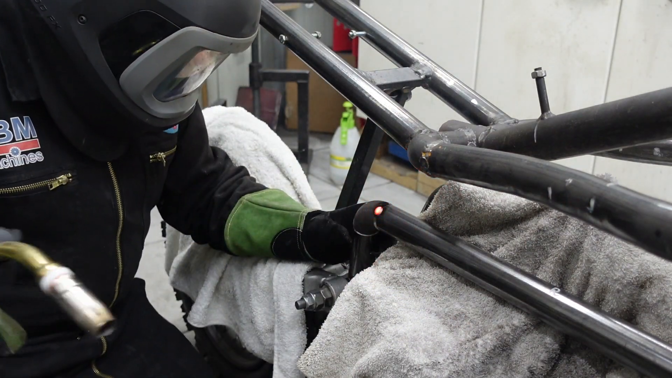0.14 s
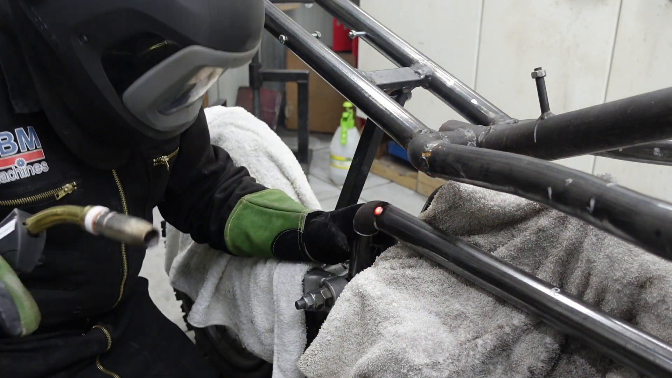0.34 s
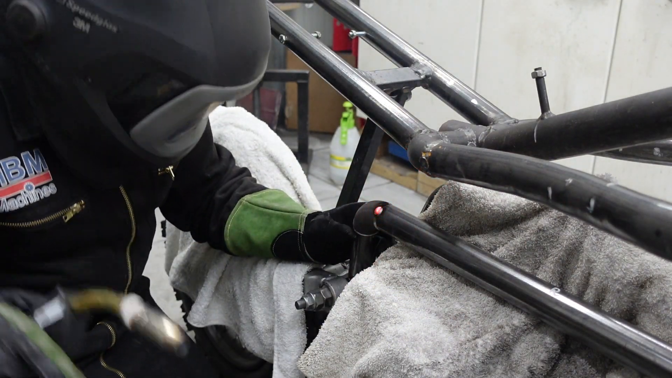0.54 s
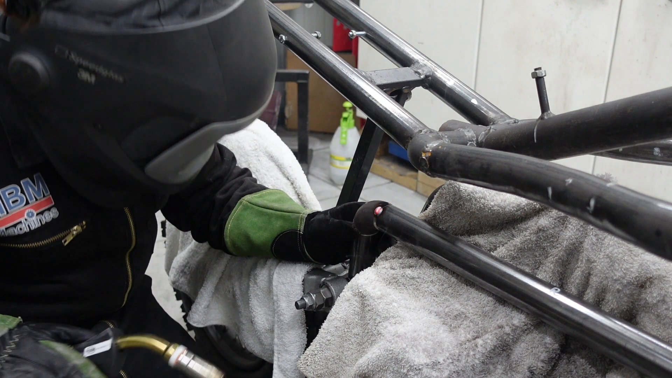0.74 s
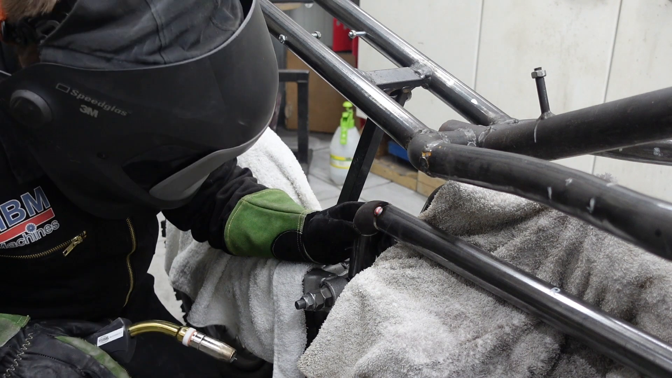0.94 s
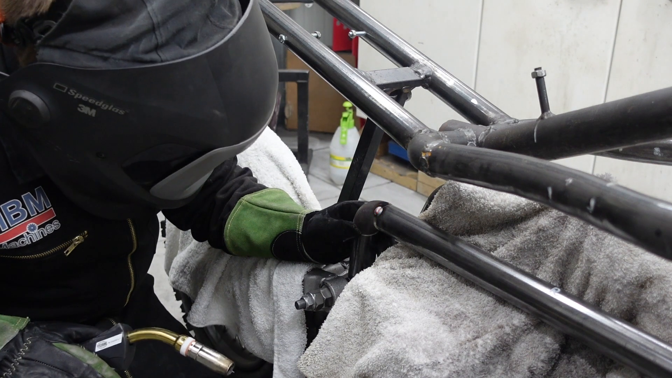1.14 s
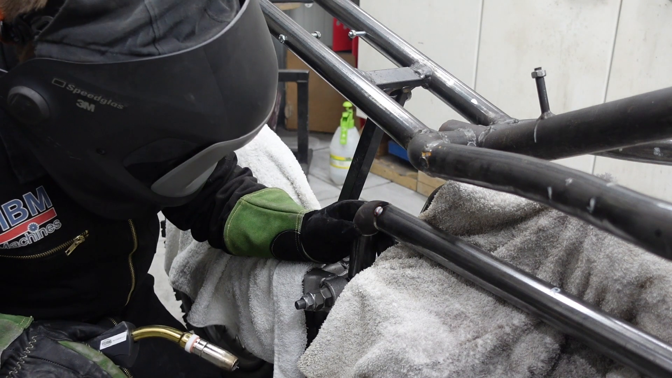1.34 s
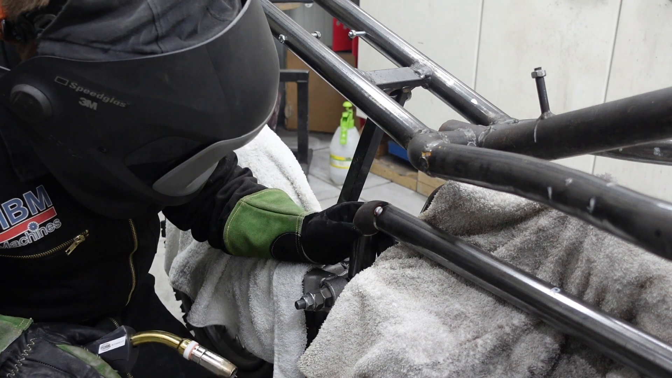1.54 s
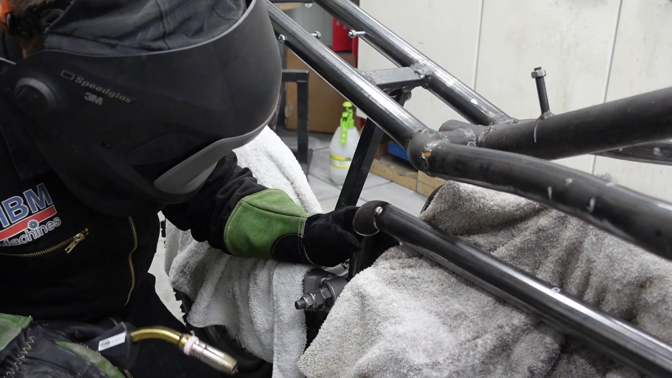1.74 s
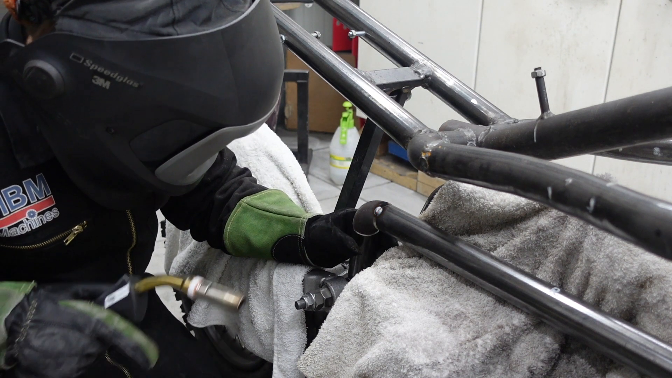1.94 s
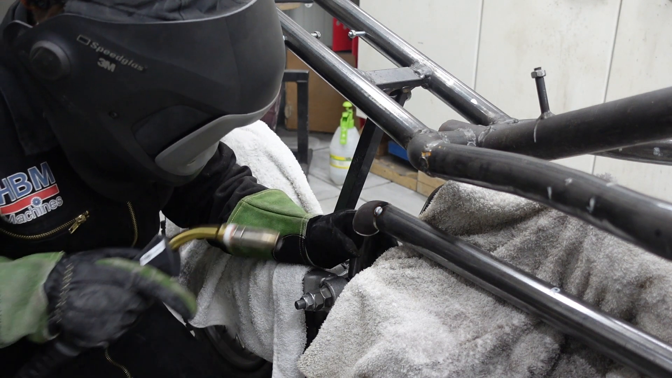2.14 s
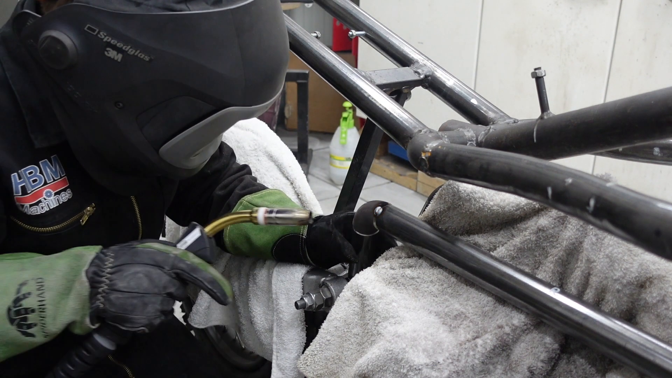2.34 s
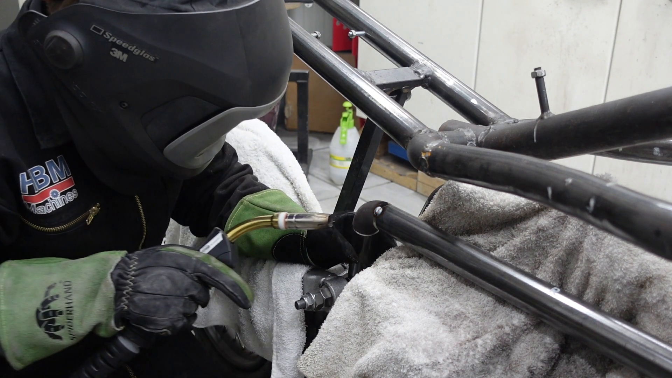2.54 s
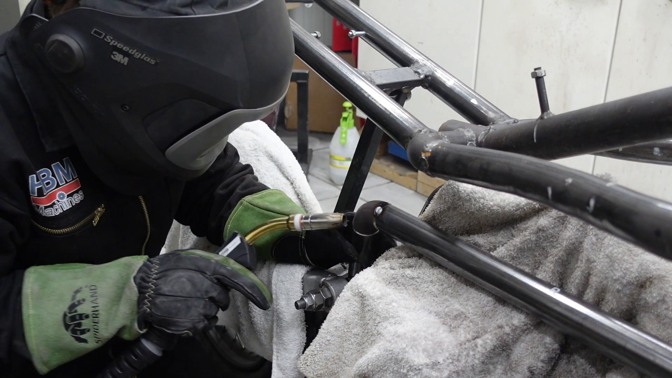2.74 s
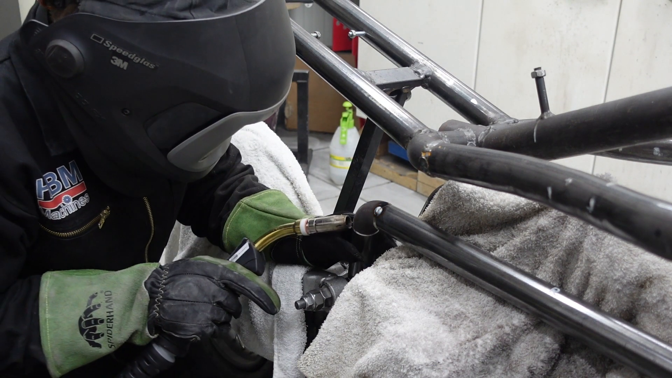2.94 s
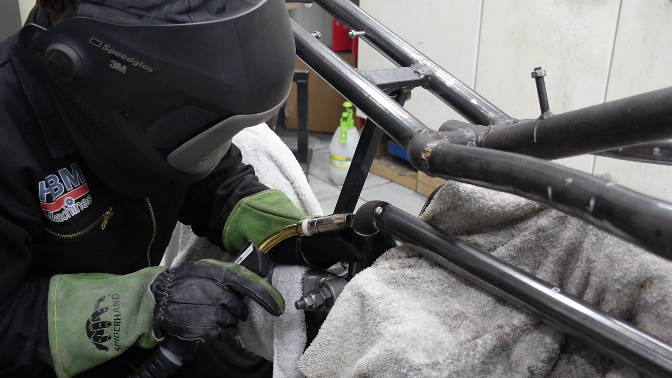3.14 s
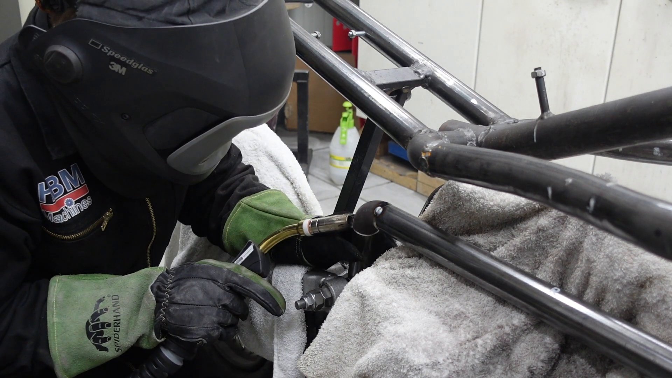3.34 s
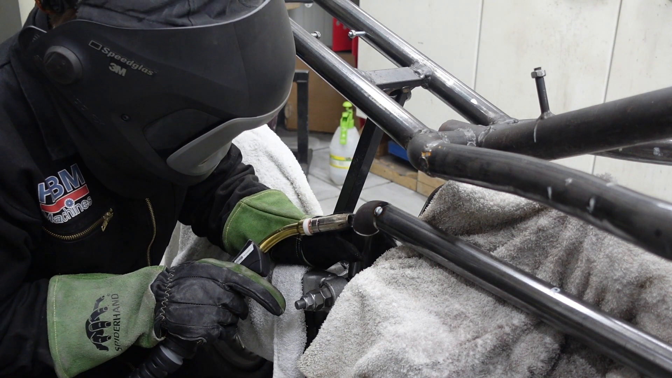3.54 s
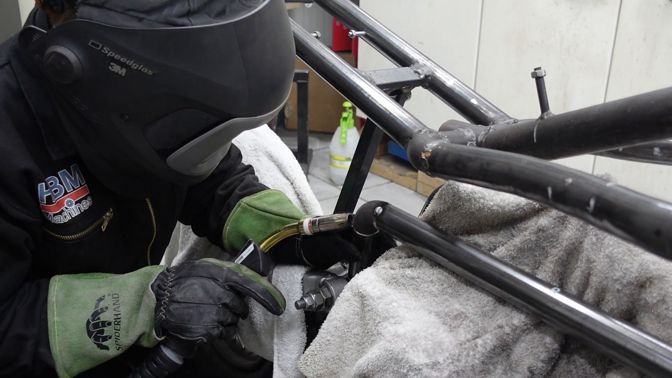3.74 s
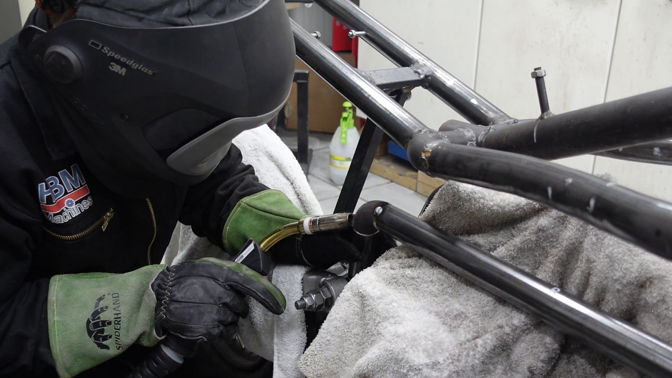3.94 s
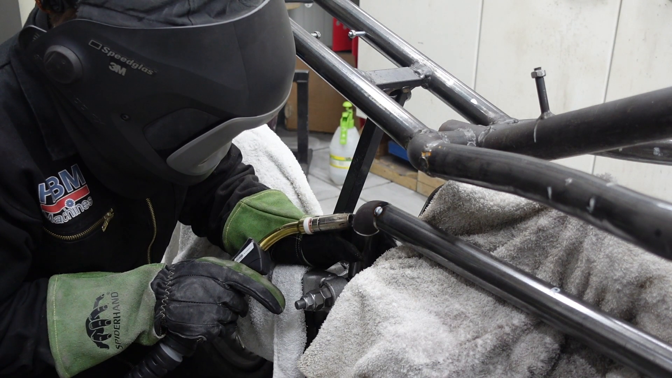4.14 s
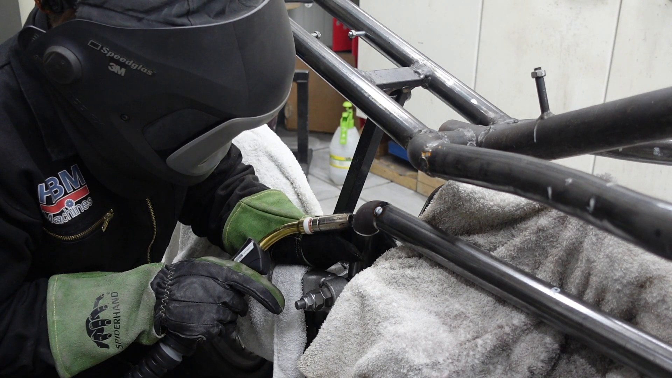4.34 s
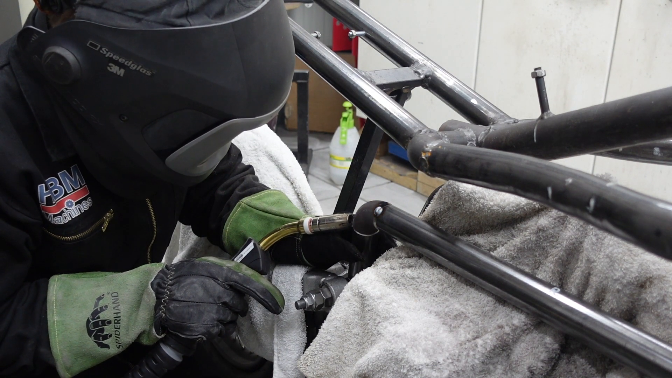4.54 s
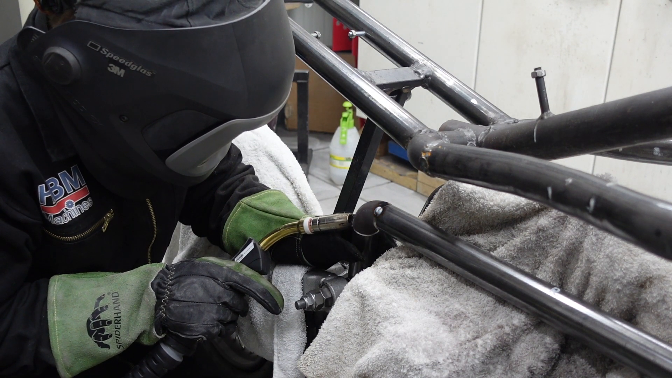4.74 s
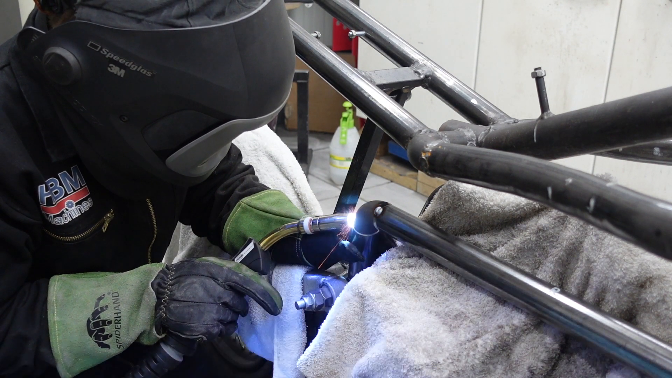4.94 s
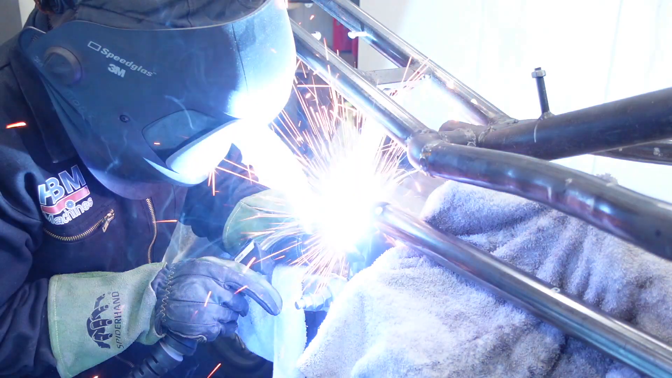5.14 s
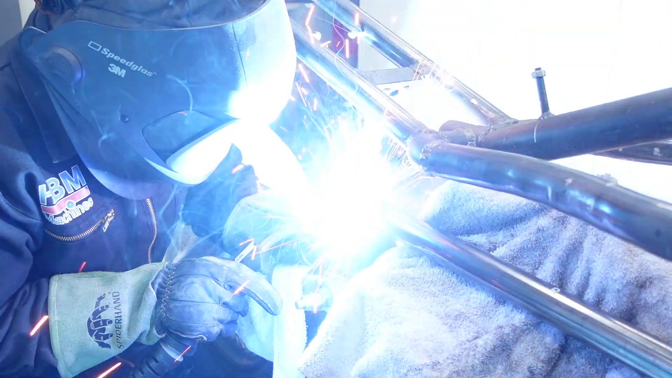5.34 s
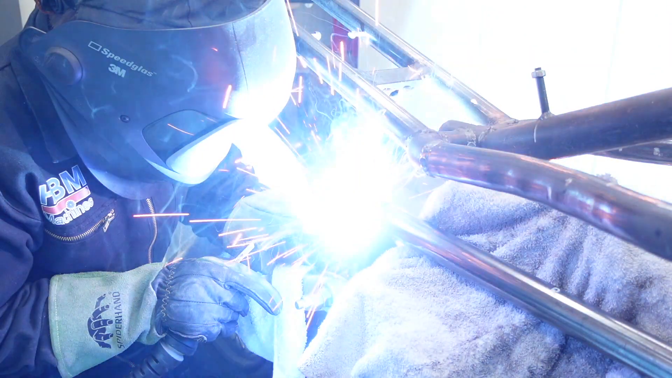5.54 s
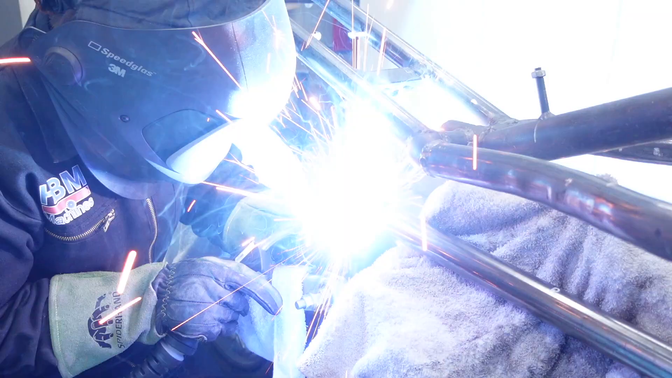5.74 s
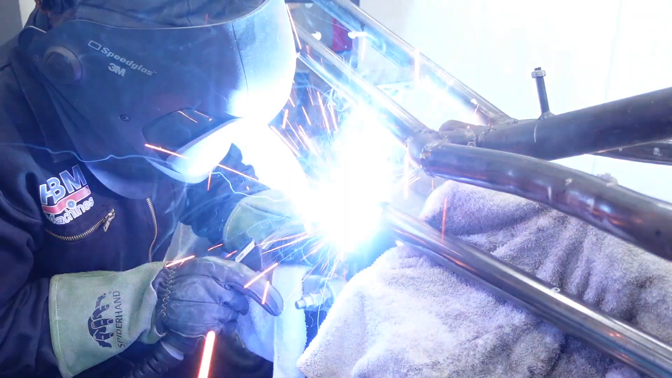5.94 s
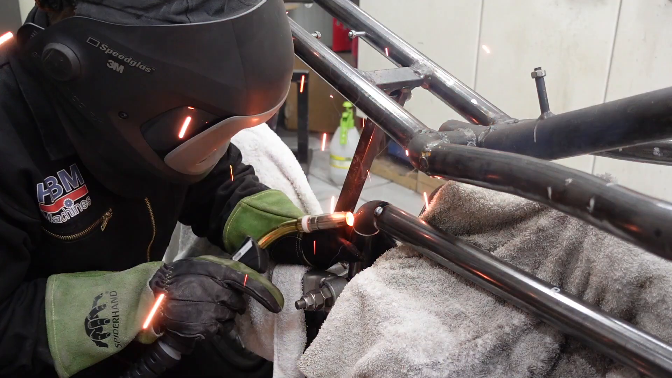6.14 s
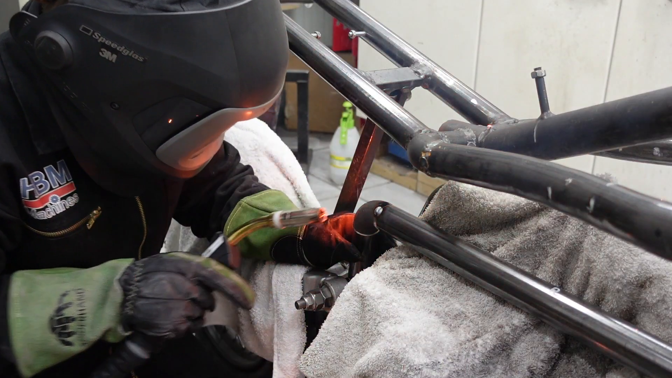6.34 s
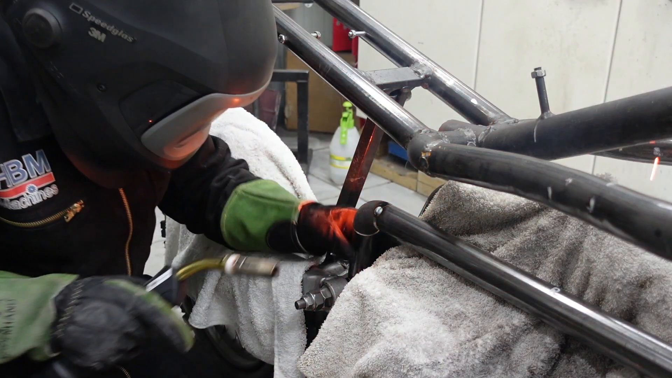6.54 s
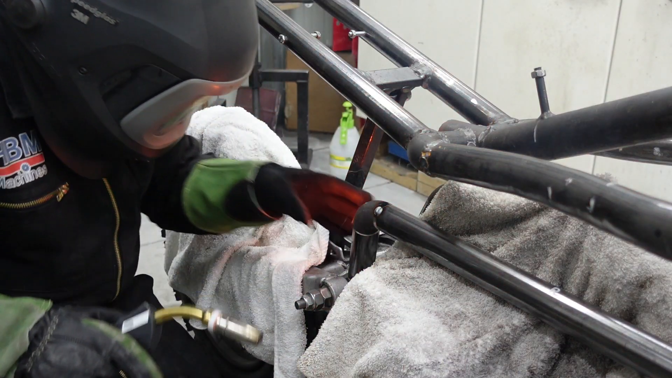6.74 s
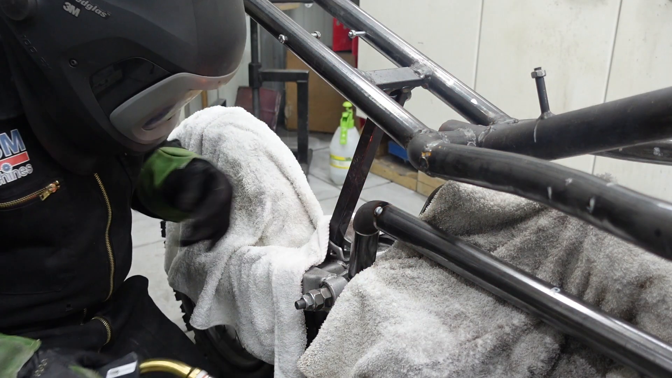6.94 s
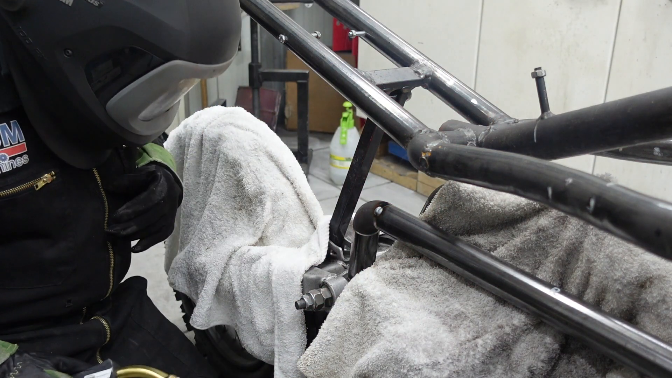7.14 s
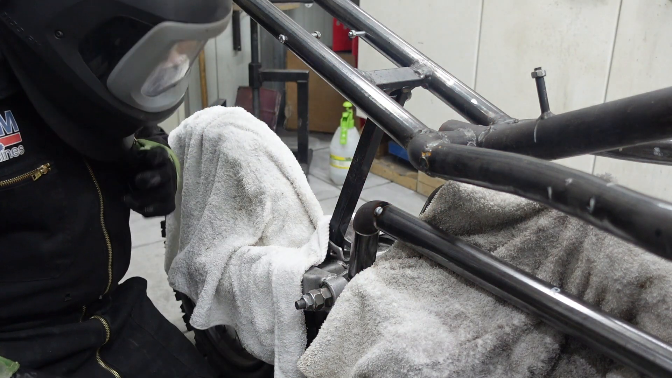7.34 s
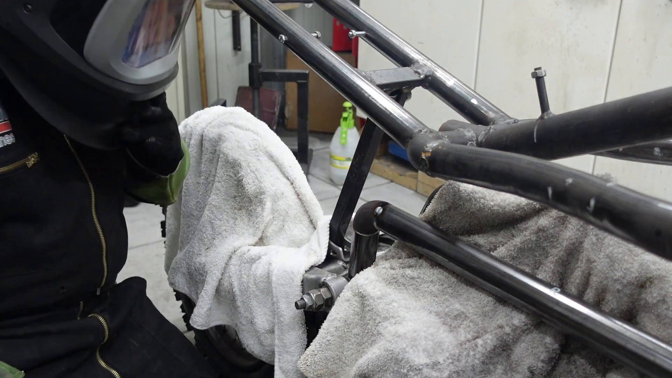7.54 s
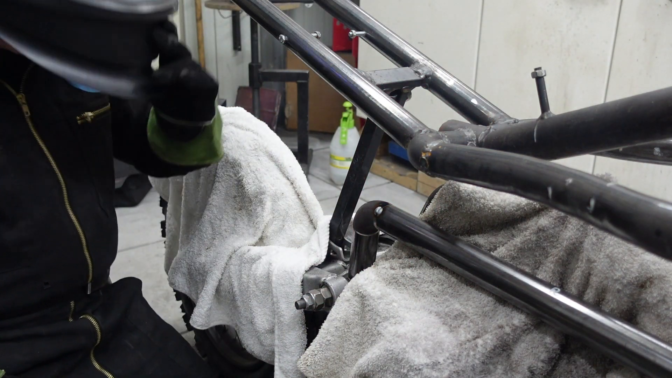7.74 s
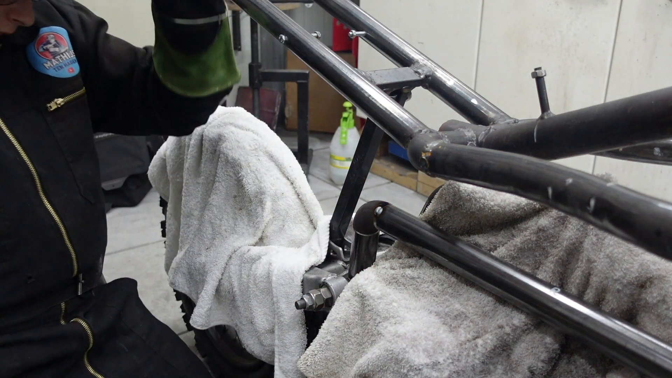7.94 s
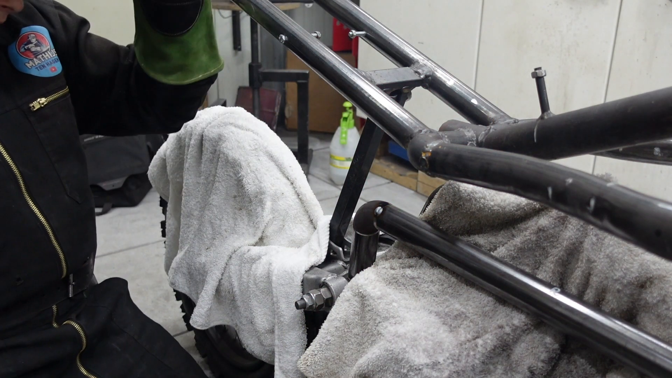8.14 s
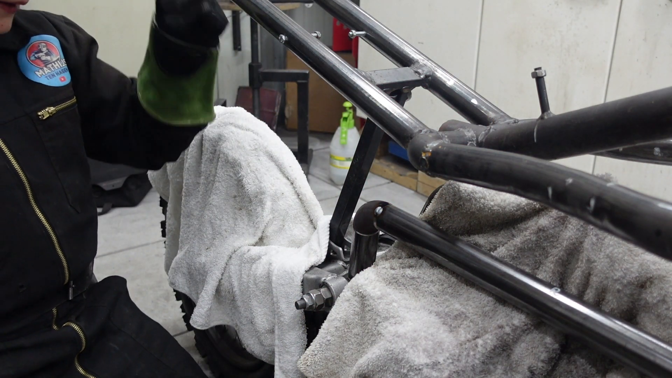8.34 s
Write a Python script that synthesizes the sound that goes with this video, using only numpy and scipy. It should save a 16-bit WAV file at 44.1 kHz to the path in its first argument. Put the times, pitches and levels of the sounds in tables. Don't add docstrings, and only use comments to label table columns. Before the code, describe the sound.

Workshop fans hum and rush steadily, then a single one-second weld burst crackles harshly nearby, cuts off, and the ducked fans swell back.

```python
import sys
import numpy as np
from scipy import signal
from scipy.io import wavfile
from scipy.ndimage import uniform_filter1d

SR = 44100
rng = np.random.default_rng(int(sys.argv[2]) if len(sys.argv) > 2 else 0)


def field_ratio(decibels):
    return 10 ** (np.asarray(decibels, dtype=float) / 20)


def output_pcm(signal):
    pcm = np.clip(np.atleast_2d(signal).T, -1, 1) * 32767
    wavfile.write(sys.argv[1], SR, np.round(pcm).astype(np.int16))


N = 373527

# start_s, peak_db (after gain control)
RESTRIKES = [(5.0107, -13), (5.0137, -13), (5.0579, -10), (5.062, -11), (5.0651, -12), (5.1266, -9),
             (5.169, -9), (5.2131, -11), (5.2335, -10), (5.2556, -9), (5.2956, -10), (5.3271, -9),
             (5.3759, -9), (5.4068, -9), (5.429, -8), (5.4632, -12), (5.4952, -8), (5.5457, -10),
             (5.6022, -9), (5.68, -10), (5.7207, -12), (5.7557, -7), (5.7828, -9), (5.7995, -8),
             (5.8637, -13), (5.9002, -12), (5.9543, -10), (6.0078, -12), (6.0417, -11), (6.056, -9)]
# freq_hz, level_db
SNAP_COLOUR = [(60, -54.5), (700, -10), (1050, -6), (1500, -7.5), (1680, 1.5), (1950, -14.5), (2500, -7.5),
               (4300, -4), (4450, -1), (5520, 0.5), (5700, -9), (8800, -2.5), (10200, -16.5), (11000, -7),
               (15500, -16)]
# time_s, sizzle_db (after gain control)
ARC_POWER = [
    (4.965, -57.5),
    (5, -23),
    (5.04, -30.5),
    (5.1, -23.5),
    (5.14, -28.5),
    (5.3, -24.5),
    (5.95, -22.5),
    (6.06, -27.5),
    (6.4, -100),
]
# freq_hz, level_db_per_hz
JET_COLOUR = [(880, -47.5), (1500, -14.5), (2740, -9), (4200, -17), (5440, 0), (7690, -0.5), (13300, -5),
              (16000, -18.5)]
# start_s, level_db, t60_s
RUSTLES = [
    (.475, -53, 0.16),
    (4.951, -50, .03),
    (4.9594, -29, .05),
    (7.99, -61, .1),
]
# start_s, level_db_rms, low_hz, high_hz, length_s
KNOCKS = [
    (.44, -78, 100, 170, 0.08),
    (0.419, -54.5, 304, 453, .08),
    (4.967, -44, 251, 893, .02),
    (4.988, -36, 300, 1095, 0.03),
    (5.035, -46, 248, 700, 0.041),
    (5.097, -45.5, 280, 700, .03),
]
# delay_ms, level_db
ECHOES = [(1.34, -8), (2.4, -14), (3.3, -15), (5.8, -15), (8.05, -11)]
# freq_hz, t60_s
SHOP_DECAY = [(300, 0.74), (1300, 0.34), (3500, 0.55), (9000, 0.3), (15000, 0.14)]
# freq_hz, level_db_per_hz
RUSH_COLOUR = [(70, -53), (190, -55), (230, -21), (320, -28), (380, -14.5), (560, -18.5), (740, -15),
               (840, -12), (1000, -14), (1550, -14.5), (2000, -17.5), (5200, -24.5), (10800, -43),
               (14800, -56)]
# freq_hz, likeness_0_to_1
RUSH_LIKENESS = [(60, 1), (180, 1), (550, 0.96), (1650, 0.73), (4970, 0.58), (15000, 0.32)]
# level_db_rms, waver_db
TONE_LEVELS = [(-69.5, 4.5), (-44, 2.12), (-52, 0), (-53.5, 0), (-54.5, 2), (-64.5, 1.5), (-60, 1),
               (-79.5, 4), (-55, 0.5), (-63, 0.5), (-61.5, 1.5), (-42.5, 0.67), (-50, 2), (-70.5, 2.5)]
# freq_hz, extra_db_per_db (of ducking past the knee)
BITE = [(100, 2), (330, 1.1), (450, 0.055), (750, 0.36), (1250, .02), (2200, 0.26), (5000, .05),
        (8000, 0.33), (12000, 1.4)]

STEADY_S, DROP_GAP_S, DROP_DB = (5.12, 6.01), (.0072, .0125), (-11., -13.5)
DROP_JITTER, DROP_SPREAD_DB = .1, 1.5
POP_SHARE, POP_AFTER_S, POP_DB = (.15, .6), (.003, .006), -16
VALVE_S, SHUT_S = 4.9594, 6.05
PUFF_DB, FLOW_DB, SETTLE_S, SHUT_DB_PER_S = -28, -36.5, 0.19, -150
SHOP_DB = 0
RUSH_DB = -39.5
DUCT_HZ, DUCT_WIDE_HZ, DUCT_DB, DUCT_SWELL_DB = 1290, 193, 5., 2
SHAFT_HZ, BLADE_HZ = 76.64, 610.7
SHAFT_ORDERS = (3, 7, 12, 14, 20, 21, 22, 24, 28, 38, 49)
TONES_HZ = [SHAFT_HZ * k for k in SHAFT_ORDERS] + [BLADE_HZ, 2 * BLADE_HZ, 2094]
KNEE_DB = -3.5
CEILING_DB, START_DB, CREEP_DB_PER_S, EASE_DB = 1.15, -6.5, 6, 4
DUCK_DB, DUCK_S, DEEPEST_DB, DEEPEST_S, HOLD_UNTIL_S = -12.5, 0.065, -15.5, 6.24, 6.534
EDGE_HZ = 15740


def evened(x):
    return x / np.sqrt(np.mean(x ** 2) + 1e-20)


def read(points, hz):
    f, value = np.transpose(points)
    return np.interp(np.log(hz + 1), np.log(f + 1), value)


def curve(rows, column):
    rows = np.array(rows)
    return np.interp(np.arange(N) / SR, rows[:, 0], rows[:, column])


def causal(points, size=2048):
    log_gain = np.log(field_ratio(read(points, abs(np.fft.fftfreq(size, 1 / SR)))))
    taps = np.fft.ifft(np.exp(np.conj(signal.hilbert(log_gain)))).real[:size // 2]
    return taps / np.linalg.norm(taps)


def drift(per_s):
    step = int(SR / per_s / 8)
    slow = rng.standard_normal(N // step + 2)
    slow = uniform_filter1d(uniform_filter1d(slow, size=4), size=4)
    return np.interp(np.arange(N) / step, np.arange(len(slow)), evened(slow))


def droplets():
    rows = list(RESTRIKES)
    steady = [s for s, db in RESTRIKES if STEADY_S[0] < s < STEADY_S[1]]
    for a, b in zip(steady, steady[1:]):
        count = max(round((b - a) / np.interp(a, STEADY_S, DROP_GAP_S)), 1)
        place = np.arange(1, count) + DROP_JITTER * rng.standard_normal(count - 1)
        s = a + place * (b - a) / count
        peak_db = np.interp(s, STEADY_S, DROP_DB) + DROP_SPREAD_DB * rng.standard_normal(count - 1)
        rows += zip(s, peak_db)
    s, db = np.transpose(rows)
    luck, wait, size = rng.random((len(s), 3)).T
    pops = (luck < np.interp(s, STEADY_S, POP_SHARE)) & (s < STEADY_S[1])
    pop_s = s + np.interp(wait, (0, 1), POP_AFTER_S)
    pop_db = POP_DB + 2 * DROP_SPREAD_DB * (size - .5)
    return np.r_[s, pop_s[pops]], np.r_[db, pop_db[pops]]


def arc(grains_per_s=14000, snap_db=1.8, rebound=.7, short_s=.003, hush=.5):
    t = np.arange(N) / SR
    ring = causal(SNAP_COLOUR)
    ring = signal.lfilter([rebound, 0, 0, -1], [1, 0, 0, -rebound], ring)
    s, peak_db = droplets()
    strikes = np.zeros(N)
    strikes[np.round(s * SR).astype(int)] = field_ratio(peak_db + snap_db) / ring.max()
    short = round(short_s * SR)
    near = np.convolve(strikes > 0, np.ones(short), "same")
    shorted = np.roll(near, -short // 2) > 0
    sputter = evened((rng.random(N) < grains_per_s / SR) * rng.standard_normal(N))
    sputter *= 1 - hush * shorted
    burning = (t > VALVE_S) & (t < ARC_POWER[-1][0])
    sizzle = burning * sputter * field_ratio(curve(ARC_POWER, column=1) + 1.4 * drift(60.))
    return signal.oaconvolve(strikes + sizzle, ring)[:N]


def gas():
    t = np.arange(N) / SR
    jet_db = FLOW_DB + (PUFF_DB - FLOW_DB) * np.exp(-((t - VALVE_S) / SETTLE_S) ** 2)
    jet_db += SHUT_DB_PER_S * np.maximum(t - SHUT_S, 0)
    return signal.oaconvolve(rng.standard_normal(N), causal(JET_COLOUR))[:N] * field_ratio(jet_db) * (t > VALVE_S)


def rustles():
    t = np.arange(N) / SR
    level = sum(field_ratio(db - 60 * abs(t - s) / t60) * (t > s) for s, db, t60 in RUSTLES)
    hiss = signal.oaconvolve(rng.standard_normal((2, N)), causal(JET_COLOUR)[None], axes=1)[:, :N]
    return hiss * level


def knocks():
    out = np.zeros(N)
    for s, db, lo_hz, hi_hz, length_s in KNOCKS:
        band = signal.butter(4, [lo_hz, hi_hz], "band", fs=SR, output="sos")
        burst = signal.sosfilt(band, rng.standard_normal(8000))
        n = round(length_s * SR)
        out[round(s * SR):][:n] += field_ratio(db) * evened(burst[-n:]) * signal.windows.tukey(n, .45)
    return out


def shop(x, own=.5, skew_ms=.023):
    taps = np.zeros((3, SR))
    at = np.arange(80, SR - 20, 20) + rng.integers(0, 20, (3, (SR - 81) // 20))
    np.put_along_axis(taps, at, rng.choice([-1., 1.], at.shape), 1)
    hz, t, z = signal.stft(taps, SR, nperseg=256)
    z = z * field_ratio(-60 * t / read(SHOP_DECAY, hz)[:, None])
    apart = own * np.clip(0.46 + hz / 6000, 0, 2.2)[:, None]
    z = z[0] + apart * z[1:]
    room = signal.istft(z, SR, nperseg=256)[1]
    room *= field_ratio(SHOP_DB) / np.linalg.norm(room[0])
    room[:, 0] = 1
    for k, (ms, db) in enumerate(ECHOES):
        for port in (0, 1):
            room[port, round((ms + skew_ms * (-1) ** k * port) * SR / 1000)] += field_ratio(db)
    return signal.fftconvolve(x[None], room, axes=1)[:, :N]


def rush(patchy_db=0.46):
    frames, hz = N // 256 + 5, np.fft.rfftfreq(1024, 1 / SR)
    a, b, c, d, patches = rng.standard_normal((frames, 513, 5)).T
    patches = evened(uniform_filter1d(uniform_filter1d(patches, size=10, axis=0), size=14, axis=1))
    same = np.clip(read(RUSH_LIKENESS, hz), -1, 1)[:, None]
    left = a + 1j * b
    right = same * left + np.sqrt(1 - same ** 2) * (c + 1j * d)
    z = np.array([left, right])
    ripple = evened(uniform_filter1d(rng.standard_normal(len(hz)), size=2))
    duct_db = DUCT_DB + DUCT_SWELL_DB * np.resize(drift(2.7)[::256], frames)
    z *= field_ratio(np.outer(np.exp(-((hz - DUCT_HZ) / DUCT_WIDE_HZ) ** 2), duct_db))
    z *= field_ratio((read(RUSH_COLOUR, hz) + 1.02 * ripple)[:, None] + patchy_db * patches)
    return field_ratio(RUSH_DB) * evened(signal.istft(z, nperseg=1024, noverlap=768)[1][:, :N])


def hum(apart=0.18):
    out = np.zeros((2, N))
    for hz, (db, waver_db) in zip(TONES_HZ, TONE_LEVELS):
        turn = 2 * np.pi * (np.cumsum(hz + 1.2 * drift(6.)) / SR + rng.random())
        lead = apart * np.sqrt(hz / 600) * drift(2.0)
        level = np.sqrt(2) * field_ratio(db + waver_db * drift(9.))
        out += level * np.sin([turn + lead / 2, turn - lead / 2])
    return out


def gain_db(t):
    def creep(db):
        return CEILING_DB - EASE_DB * np.logaddexp(0, (CEILING_DB - db) / EASE_DB)
    before = creep(START_DB + CREEP_DB_PER_S * t)
    after = creep(DEEPEST_DB + CREEP_DB_PER_S * np.maximum(t - HOLD_UNTIL_S, 0))
    during = np.interp(t, [VALVE_S, VALVE_S + DUCK_S, SHUT_S, DEEPEST_S],
                       [CEILING_DB, DUCK_DB, DUCK_DB, DEEPEST_DB])
    return np.where(t < VALVE_S, before, np.where(t < DEEPEST_S, during, after))


def denoised(x):
    hz, t, z = signal.stft(x, SR, nperseg=1024)
    past_db = np.minimum(gain_db(t) - KNEE_DB, 0)
    return signal.istft(z * field_ratio(read(BITE, hz)[:, None] * past_db), SR, nperseg=1024)[1][:, :N]


def scene():
    lift = field_ratio(-gain_db(np.arange(N) / SR))
    torch = shop((arc() + gas()) * lift) + (rustles() + knocks()) * lift
    fans = denoised(rush() + hum())
    return (torch + fans) * field_ratio([[-.25], [.25]])


def band_limit(x):
    return signal.sosfilt(signal.butter(12, 16860, fs=SR, output="sos"), x)


def record(dry):
    ducked = dry * field_ratio(gain_db(np.arange(N) / SR))
    edge = signal.firwin(1023, EDGE_HZ, window=("kaiser", 8), fs=SR)
    mix = signal.oaconvolve(ducked, edge[None], "same", axes=1)
    return band_limit(mix)


dry = scene()
out = record(dry)
output_pcm(out)
```